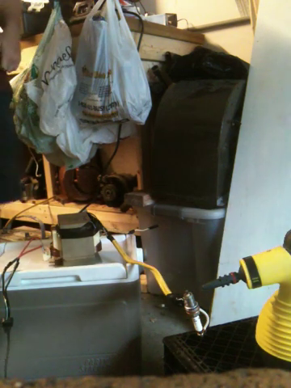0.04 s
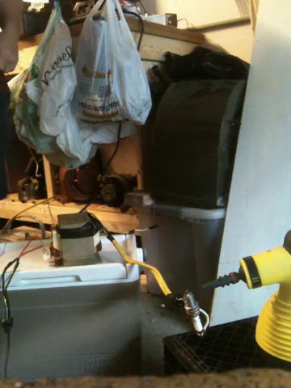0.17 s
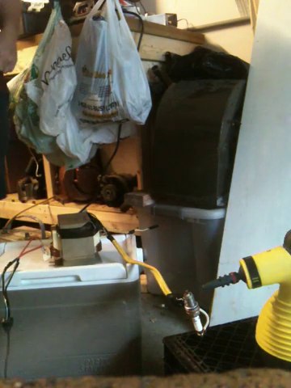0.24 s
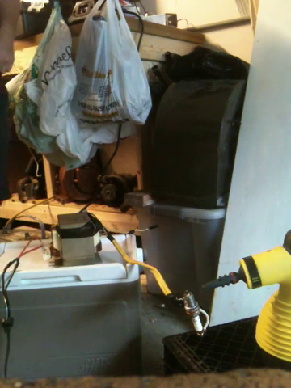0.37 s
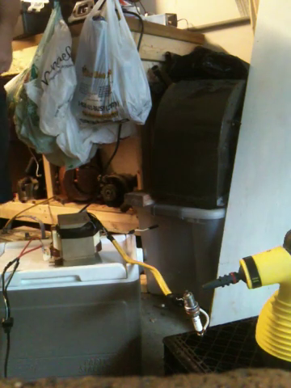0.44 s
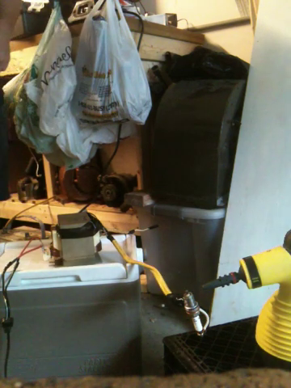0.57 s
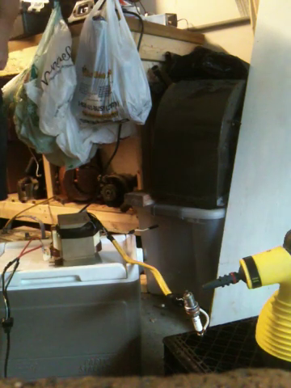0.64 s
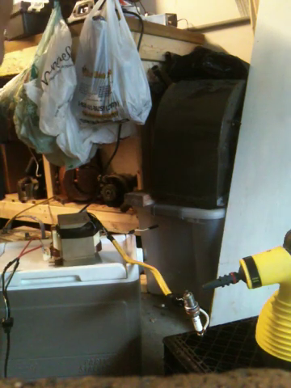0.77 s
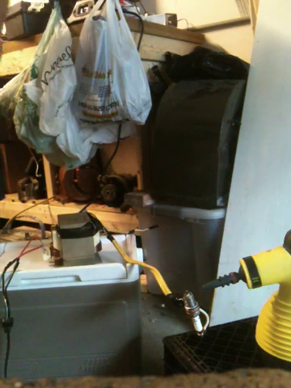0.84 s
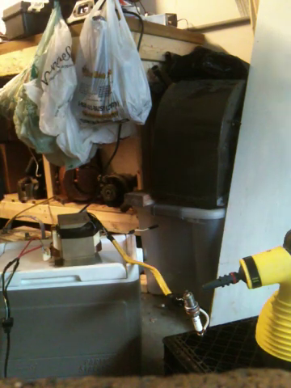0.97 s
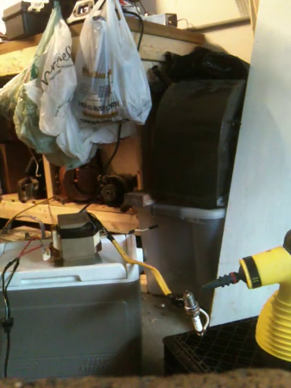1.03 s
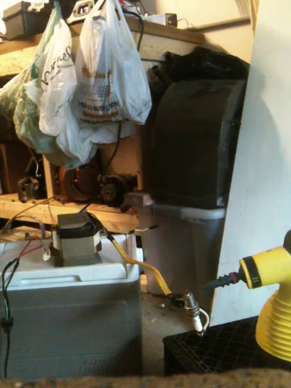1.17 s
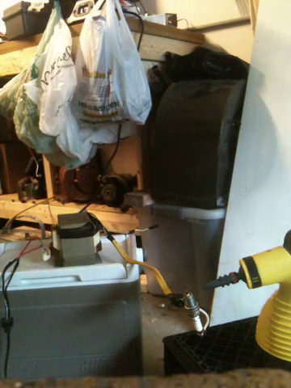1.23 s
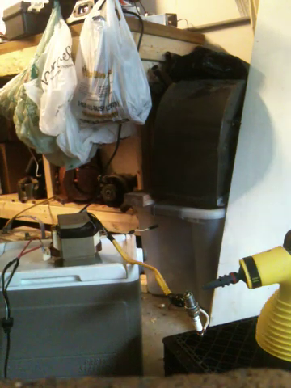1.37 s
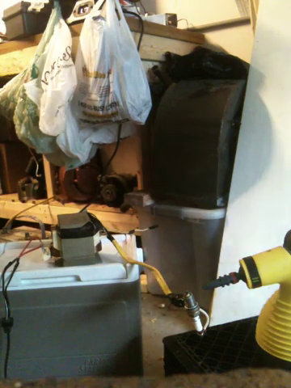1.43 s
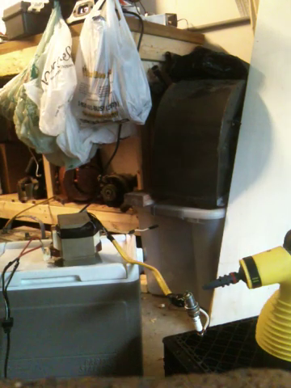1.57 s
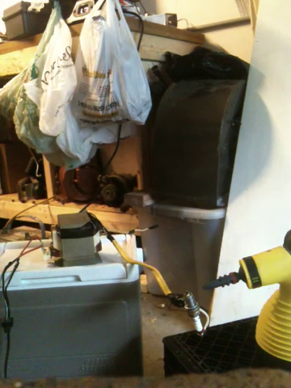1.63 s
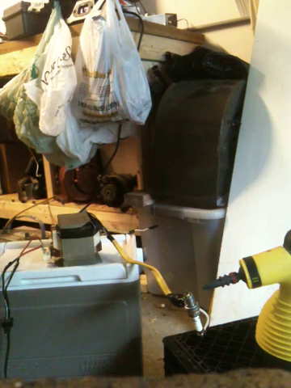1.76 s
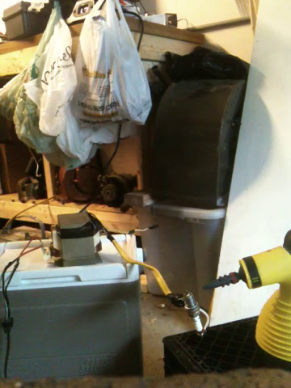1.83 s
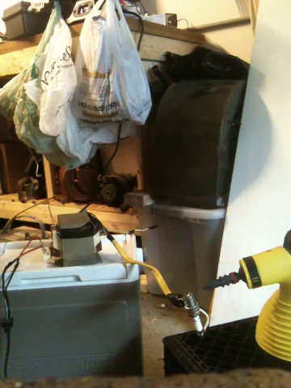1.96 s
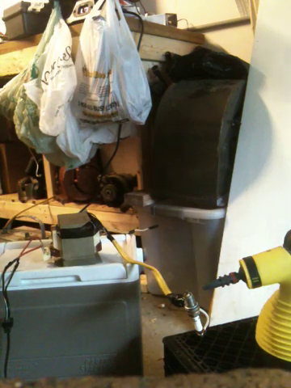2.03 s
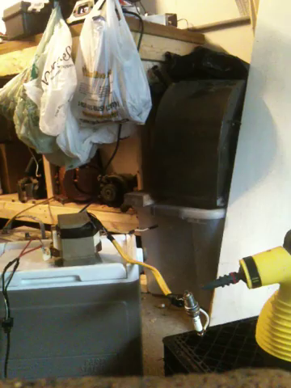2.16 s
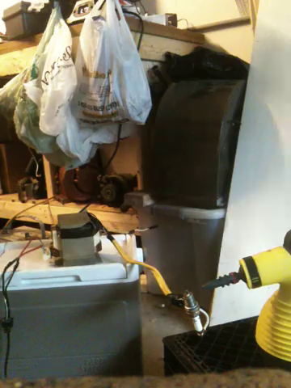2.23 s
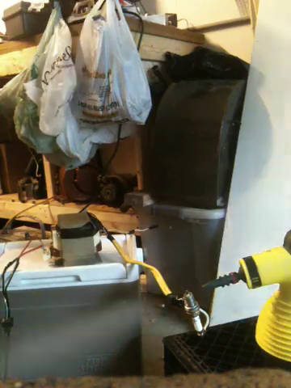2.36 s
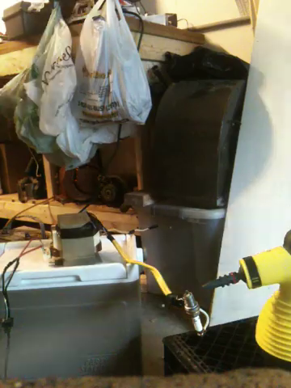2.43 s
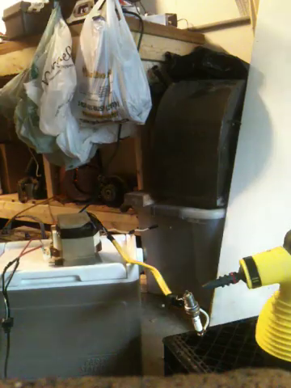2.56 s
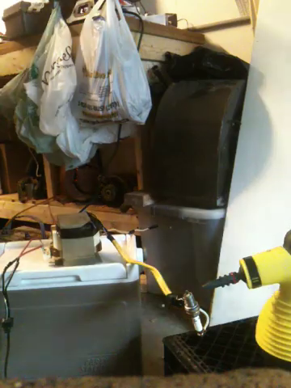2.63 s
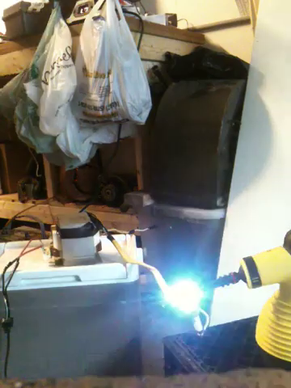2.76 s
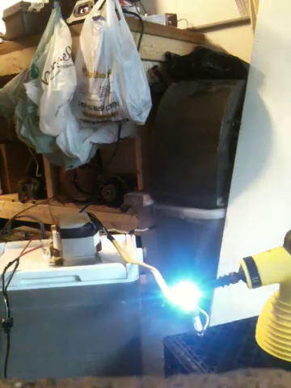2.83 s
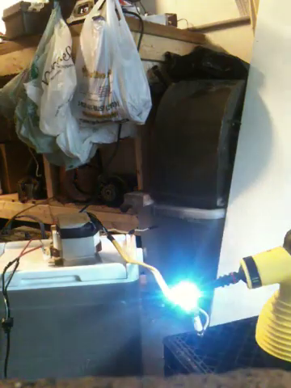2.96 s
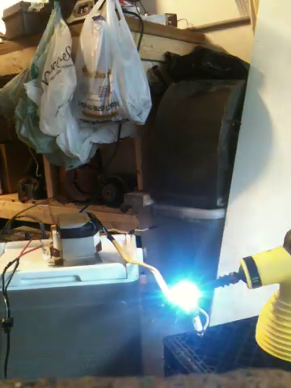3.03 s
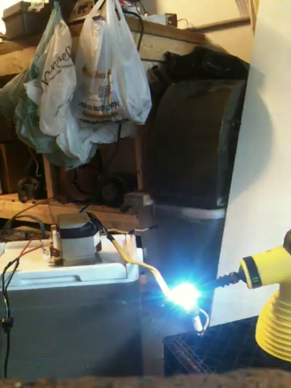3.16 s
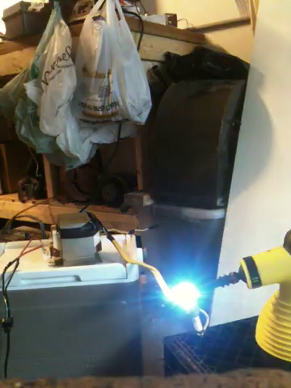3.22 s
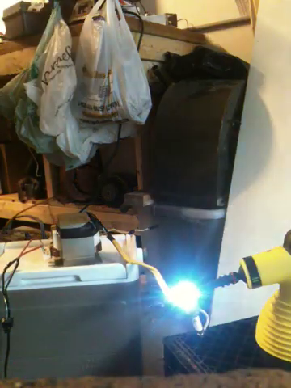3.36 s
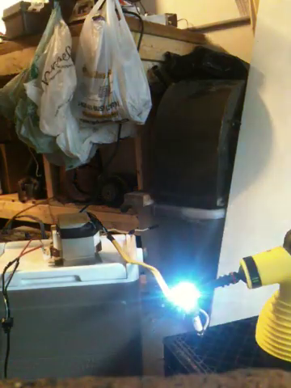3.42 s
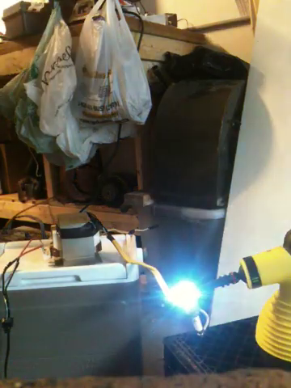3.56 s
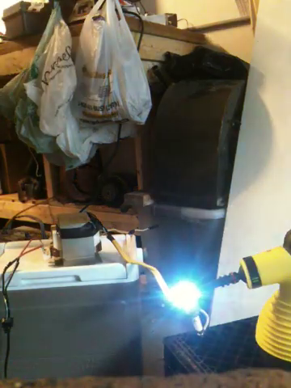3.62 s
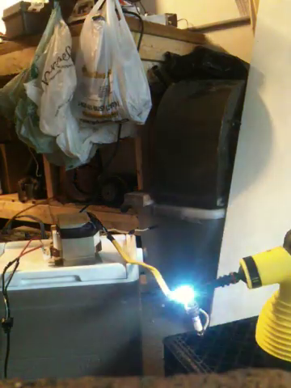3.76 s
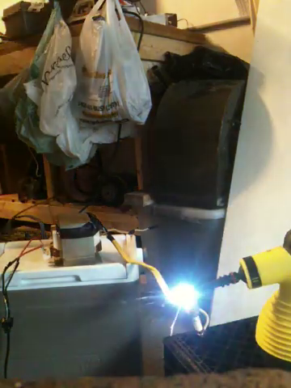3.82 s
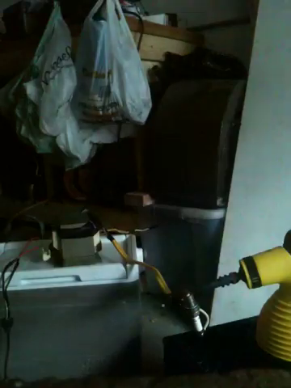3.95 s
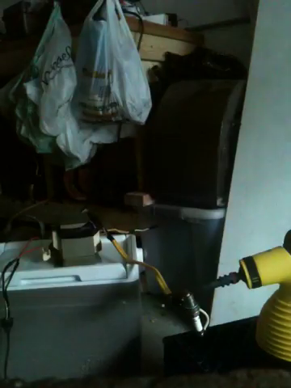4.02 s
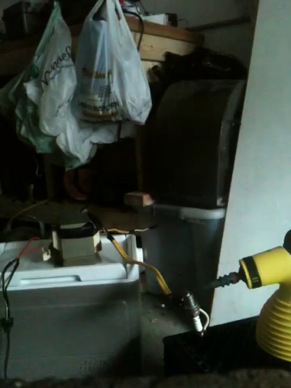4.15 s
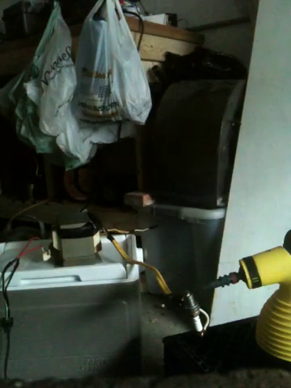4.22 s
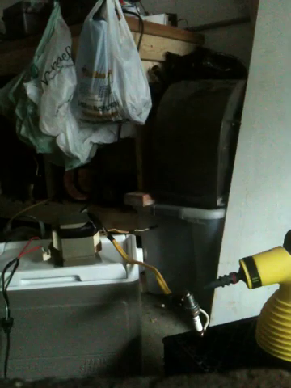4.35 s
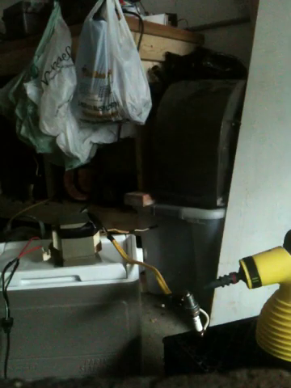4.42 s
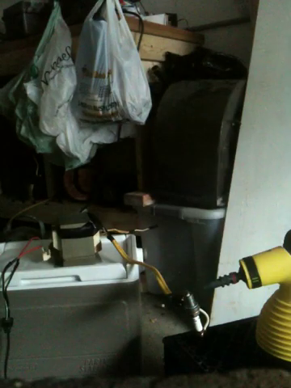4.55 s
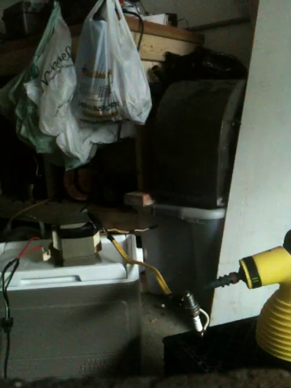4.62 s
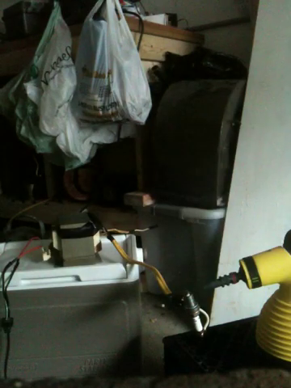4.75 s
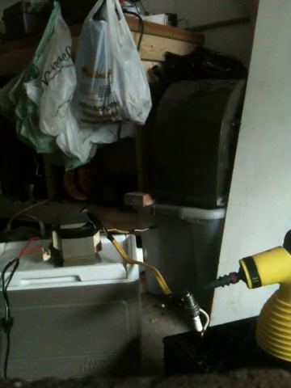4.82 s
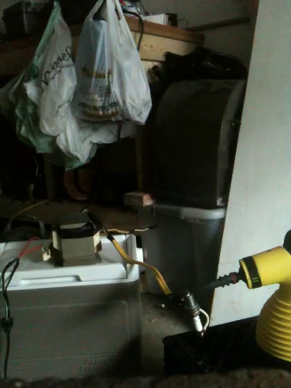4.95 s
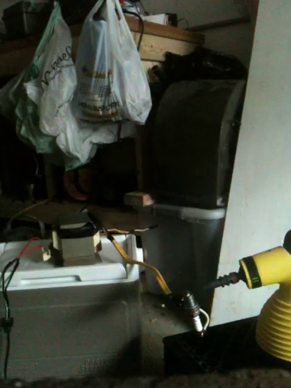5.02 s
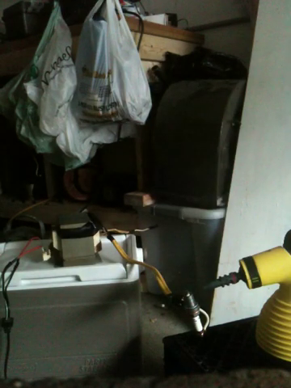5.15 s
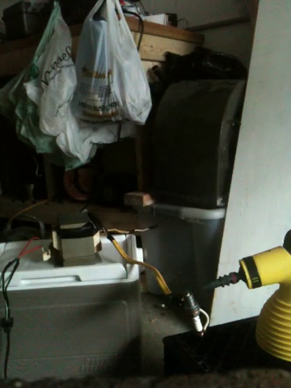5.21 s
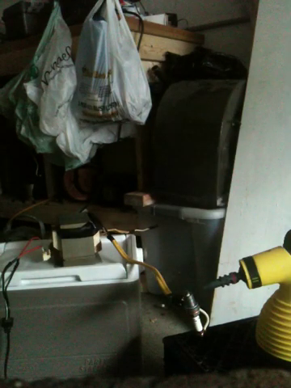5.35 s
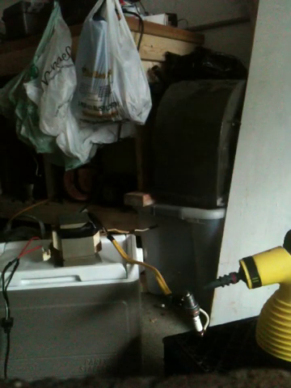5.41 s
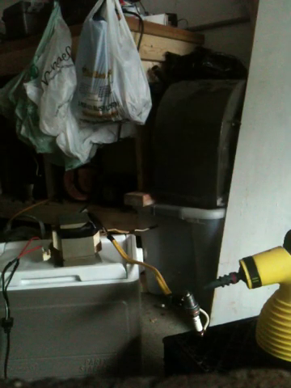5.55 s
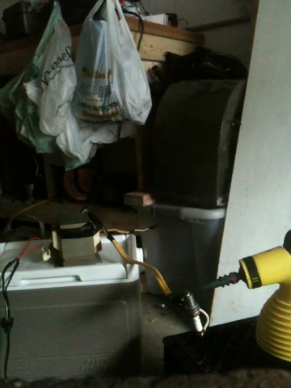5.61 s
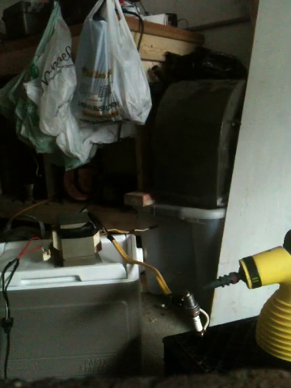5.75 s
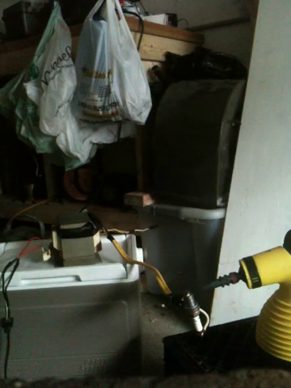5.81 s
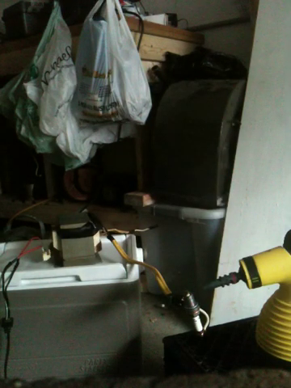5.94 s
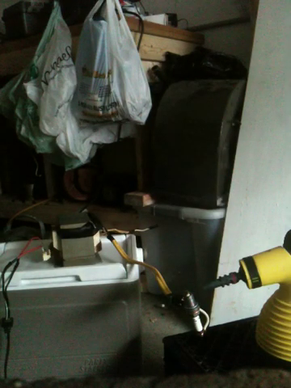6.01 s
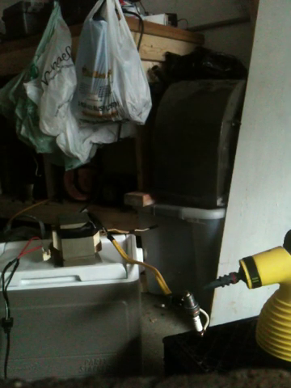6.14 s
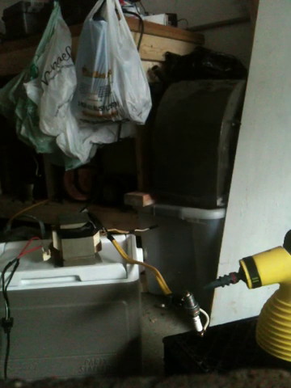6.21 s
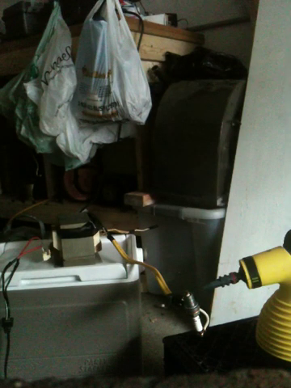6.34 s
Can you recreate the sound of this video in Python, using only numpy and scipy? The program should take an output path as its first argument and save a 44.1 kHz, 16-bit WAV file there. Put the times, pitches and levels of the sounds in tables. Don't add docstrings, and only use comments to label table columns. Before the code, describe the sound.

Faint steady hiss and small clicks in a cluttered shed, then a second-long burst of harsh buzzing electric arc with sharp cracks, cutting off abruptly.

```python
import sys
import numpy as np
from scipy import signal
from scipy.fft import rfft, irfft
from scipy.io import wavfile
from scipy.ndimage import uniform_filter1d

SR = 44100
rng = np.random.default_rng(int(sys.argv[2]) if len(sys.argv) > 2 else 0)


def linear_from_db(decibels):
    return 10 ** (np.asarray(decibels, float) / 20)


def master_out(mix):
    frames = np.transpose(np.atleast_2d(mix))
    ceiling = np.clip(frames, -1, 1)
    pcm = np.round(ceiling * 32767).astype(np.int16)
    wavfile.write(sys.argv[1], SR, pcm)


N = 280476
MAINS_HZ = 60


def rms_one(x):
    return x / np.sqrt(np.mean(x ** 2) + 1e-20)


def unit(x):
    return x / np.sqrt(np.sum(x ** 2) + 1e-20)


def in_time(rows, outside_db=None):
    s, db = np.transpose(rows)
    return linear_from_db(np.interp(np.arange(N) / SR, s, db, outside_db, outside_db))


def at_hz(points, hz):
    table_hz, values = np.transpose(points)
    return np.interp(np.log(hz), np.log(table_hz), values)


def colour(spectrum, size=4096):
    hz = np.maximum(np.fft.rfftfreq(size, 1 / SR), 1)
    cepstrum = irfft(np.log(linear_from_db(at_hz(spectrum, hz))))
    cepstrum[1:size // 2] *= 2
    cepstrum[size // 2 + 1:] = 0
    response = irfft(np.exp(rfft(cepstrum)))
    return response / np.sqrt(np.sum(response ** 2))


def resonance(x, hz, width_hz):
    r = np.exp(-np.pi * width_hz / SR)
    poles = [1, -2 * r * np.cos(2 * np.pi * hz / SR), r * r]
    return signal.lfilter([(1 - r * r) / 2, 0, (r * r - 1) / 2], poles, x)


def burst(length_s, hz, width_hz, size=4096):
    age = 4 * np.arange(size) / (max(length_s, 1e-4) * SR)
    push = rng.standard_normal(size) * age * np.exp(-age)
    pole_width_hz = 2.36 * width_hz
    tinted = resonance(resonance(push, hz, pole_width_hz), hz, pole_width_hz)
    return unit(tinted), unit(push)


def walls(delay_s=0.006, build_up_s=0.003, even_hz=100):
    # (frequency [Hz], T60 [s])
    shed_t60 = [(100, 0.28), (600, 0.15), (1200, .2), (3000, 0.34), (6000, 0.28), (14000, 0.088)]
    t = np.arange(SR // 2) / SR
    edges_hz = np.append(40 * 2 ** np.arange(0, 9.1), 0.49 * SR)
    white = rng.standard_normal((2, len(t)))
    tail = 0
    for k, (low_hz, high_hz) in enumerate(zip(edges_hz, edges_hz[1:])):
        band_pass = signal.butter(2, [low_hz, high_hz], "band", fs=SR, output="sos")
        t60_s = at_hz(shed_t60, np.sqrt(low_hz * high_hz))
        tail = tail + signal.sosfilt(band_pass, white[k % 2]) * linear_from_db(-60 * t / t60_s)
    build_up = 1 - np.exp(-np.maximum(t - delay_s, 0) / build_up_s)
    spectrum = rfft(tail * build_up)
    smooth_power = uniform_filter1d(np.abs(spectrum) ** 2, round(even_hz / 2))
    answer = irfft(spectrum / np.sqrt(smooth_power))
    return unit(answer * (t > delay_s))


def steam():
    # (time [s], level [dB])
    flow = [(0, -48), (.6, -47.5), (1.3, -46.5), (2.2, -46), (2.8, -45.5), (4.2, -44.5), (5.2, -44.5),
            (6.36, -44)]
    # (frequency [Hz], density [dB per Hz])
    hiss = [(40, -27), (120, 0.5), (300, -2.5), (500, -8), (1000, -0.5), (4000, 1.5), (9000, -2),
            (16000, 5.5)]
    # (frequency [Hz], width [Hz], level [dB])
    whistles = [(209, 37, -25.5), (1130, 420, -18), (2220, 67, -23.5), (4370, 54, -24.5), (5270, 43, -24)]
    white = rng.standard_normal((2, N + SR))
    jet = signal.fftconvolve(white[0], colour(hiss))[:N + SR]
    for hz, width_hz, db in whistles:
        jet += linear_from_db(db) * rms_one(resonance(resonance(white[1], hz, width_hz), hz, width_hz))
    return rms_one(jet[SR:]) * in_time(flow)


def contacts():
    # (delay [s], contact [s], frequency [Hz], width [Hz], direct share [dB])
    click_parts = [
        (0.00089, 0.0049, 74, 140, 4.5),
        (0.00028, 0.0043, 820, 610, 5),
        (.0008, 0.0028, 7200, 6000, 2.5),
    ]
    # (time [s], thud level [dB], casing level [dB], snap level [dB])
    clicks = [
        (.0085, -29, -31.5, -26),
        (.224, -27, -26.5, -28),
        (2.401, -25.5, -21, -16.5),
    ]
    # (time [s], frequency [Hz], width [Hz], level [dB])
    rings = [
        (.011, 4420, 300, -27),
        (.014, 3520, 200, -28.5),
        (.229, 3200, 600, -26.5),
        (.23, 5300, 1200, -32),
        (2.403, 4276, 30, -20.5),
        (2.404, 2400, 895, -20.5),
    ]
    # (time [s], contact [s], frequency [Hz], level
    # [dB])
    rustles = [(1.949, 0.018, 1019, -26), (1.957, .0072, 3470, -31), (2.316, 0.014, 194, -25),
               (2.314, 0.026, 940, -27), (2.93, .04, 50, -24), (4.743, 0.03, 4300, -27.5),
               (4.755, 0.02, 500, -38), (5.028, .012, 700, -40), (5.115, .025, 4500, -27.5),
               (5.12, 0.021, 1200, -26.5), (5.121, .0083, 250, -39.5)]
    parts = []
    for s, *levels_db in clicks:
        for (delay_s, length_s, hz, width_hz, direct_db), db in zip(click_parts, levels_db):
            parts.append((s + delay_s, length_s, hz, width_hz, db, direct_db))
    for s, hz, width_hz, db in rings:
        parts.append((s, 0.016, hz, width_hz, db, -1))
    for s, length_s, hz, db in rustles:
        direct_db = 4 + 0.1 * np.log2(hz / 1000)
        parts.append((s, length_s, hz, 0.7 * hz, db, direct_db))
    return parts


def knocks():
    out = np.zeros((2, N))
    for s, length_s, hz, width_hz, db, direct_db in contacts():
        hit = linear_from_db(db + 7.5) * burst(length_s, hz, width_hz)[0]
        start = round(s * SR)
        out[:, start:start + len(hit)] += hit * linear_from_db([[0], [direct_db - 6]])
    return out


def hum(on_s=2.845, off_s=3.972, level_db=-52, swell_db_per_s=2.5, rise_s=0.0029, release_db_per_s=303):
    # (multiple of mains, level [dB])
    hum_orders = [(2, 4), (3, -25), (4, -2.5), (6, -22), (8, -9)]
    t = np.arange(N) / SR
    tone = 0
    for k, db in hum_orders:
        tone = tone + linear_from_db(db) * np.sin(int(k) * 2 * np.pi * MAINS_HZ * t + k * k)
    swell_db = level_db + swell_db_per_s * (t - on_s)
    release_db = release_db_per_s * np.maximum(t - off_s, 0)
    return np.sqrt(2) * tone * linear_from_db(swell_db - release_db) * np.clip((t - on_s) / rise_s, 0, 1)


def crackle(per_s=2000, spread_db=3.0, flicker_db=2.5, reverse_db=-1.0, strike_s=3.3353, dull_hz=4300):
    # (time [s], level [dB])
    burning = [
        (2.845, -33.5),
        (2.98, -29.5),
        (3.14, -30.5),
        (3.21, -25.5),
        (3.31, -28),
        (3.5, -26.5),
        (3.75, -26),
        (3.81, -28.5),
        (3.972, -26.5),
    ]
    cycles = (np.arange(N) / SR - strike_s) * MAINS_HZ
    half = np.floor(2 * cycles).astype(int)
    flicker = flicker_db * rng.standard_normal(N)[half - half[0]]
    strength = linear_from_db(flicker + reverse_db * (half % 2))
    current = np.sin(np.pi * (2 * cycles - half) ** 0.66) ** 2
    fired = rng.random(N) < 2 * per_s * current / SR
    sizes = linear_from_db(spread_db * np.minimum(rng.exponential(1, N), 4)) * rng.choice([-1, 1], N)
    low_pass = signal.butter(1, dull_hz, fs=SR, output="sos")
    soft = signal.sosfilt(low_pass, fired * sizes * strength)
    return rms_one(soft) * in_time(burning, outside_db=-200)


def cracks(boost_db=12, width_hz=2500, broad_db=8.0, snap_hz=7500, snap_db=-3, flash_db=-8, flash_width_hz=200):
    # (time [s], peak level [dB], brightest frequency [Hz])
    restrikes = [(2.8426, -19, 1160), (2.941, -20.5, 6240), (2.983, -25, 4230), (3.0182, -16, 3760),
                 (3.1671, -10.5, 4660), (3.2686, -13, 5300), (3.3348, -10, 4000), (3.3841, -11.5, 6450),
                 (3.402, -16, 6830), (3.418, -9.5, 4370), (3.468, -12.5, 4970), (3.4853, -15, 6000),
                 (3.5684, -16, 2170), (3.5857, -12, 5355), (3.6037, -11.5, 5270), (3.651, -9, 4550),
                 (3.751, -14.5, 1090), (3.8171, -11, 5550), (3.8328, -9.5, 3200), (3.9341, -13.5, 6540),
                 (3.9508, -14, 4300)]
    full_s, full_db, db_per_halving = 0.0056, -11.5, 10
    out = np.zeros(N)
    high_pass = signal.butter(2, snap_hz, "high", fs=SR, output="sos")
    for s, db, hz in restrikes:
        length_s = full_s * 2 ** ((db - full_db) / db_per_halving)
        tinted, broad = burst(length_s, hz, width_hz)
        flash = unit(resonance(tinted, hz, flash_width_hz))
        snap = signal.sosfilt(high_pass, broad)
        sparks = tinted + linear_from_db(flash_db) * flash + linear_from_db(broad_db) * broad + linear_from_db(snap_db + 3) * snap
        start = round(s * SR)
        out[start:start + len(broad)] += linear_from_db(db + boost_db) * sparks
    return out


def arc():
    # (frequency [Hz], density [dB per Hz])
    spark_colour = [(60, -20), (130, -2), (400, -8), (750, -5), (1080, 0.5), (3000, -3.5), (8000, -4.5),
                    (16000, 4.5)]
    # (frequency [Hz], width [Hz], level [dB])
    plug = [(847, 28, -31), (1035, 22, -27.5), (1133, 73, -27), (1255, 45, -31), (1320, 12, -34.5),
            (2144, 21, -27), (2960, 28, -29.5), (3120, 21, -30.5), (3410, 15, -36), (3735, 31, -31.5),
            (4400, 14, -34.5), (5320, 26, -30.5), (5500, 20, -29), (6460, 20, -49)]
    sparks = crackle() + cracks()
    ringing = 0
    for hz, width_hz, db in plug:
        gain = linear_from_db(db) * np.sqrt(SR / np.pi / width_hz)
        ringing = ringing + gain * resonance(sparks, hz, width_hz)
    return signal.fftconvolve(sparks, colour(spark_colour))[:N] + ringing


def scene(arc_direct_db=-6.5):
    room = walls()
    sparks = arc()
    sent, straight = knocks()
    reverberant = signal.fftconvolve(sparks + sent, room)[:N]
    mix = linear_from_db(arc_direct_db) * sparks + straight + reverberant + hum() + steam()
    return mix[None]


def top_cut(x):
    return signal.sosfilt(signal.butter(12, 17600, fs=SR, output="sos"), x)


def record(dry, top_edge_hz=13500, above_edge_db=-11.5):
    # (frequency [Hz], gain [dB])
    microphone = [(30, -57), (100, -15), (250, -8), (600, -0.5), (1080, -2.5), (1600, -5.5), (2200, -1.5),
                  (3200, -1), (5200, 0.5), (7000, -1), (8800, -5.5), (10600, -4), (13300, -17),
                  (17000, -9.5)]
    heard = signal.fftconvolve(dry, linear_from_db(1) * colour(microphone)[None])[:, :N]
    edge = colour([(1, 0), (top_edge_hz, 0), (top_edge_hz + 300, above_edge_db),
                   (17300, above_edge_db), (17700, -70)])
    mix = signal.fftconvolve(heard, edge[None])[:, :N]
    return top_cut(mix)


dry = scene()
out = record(dry)
master_out(out)
```